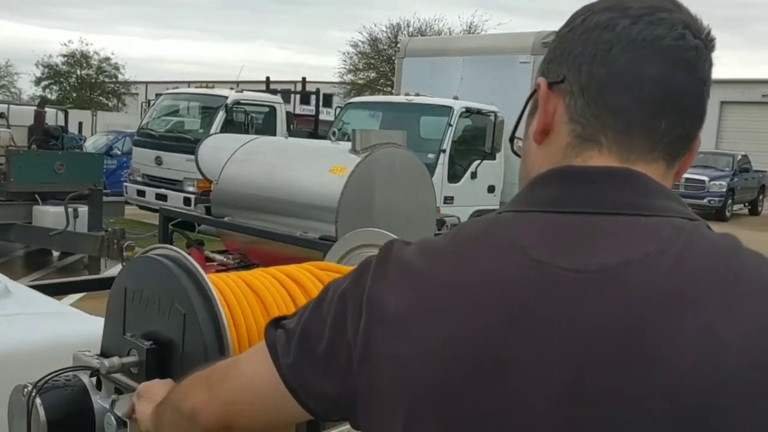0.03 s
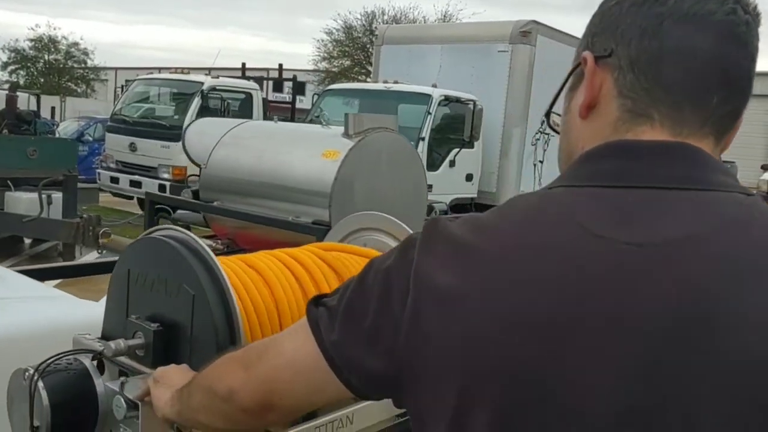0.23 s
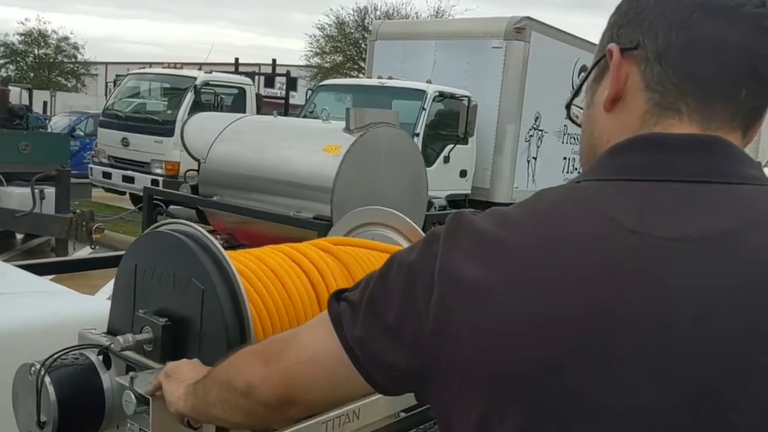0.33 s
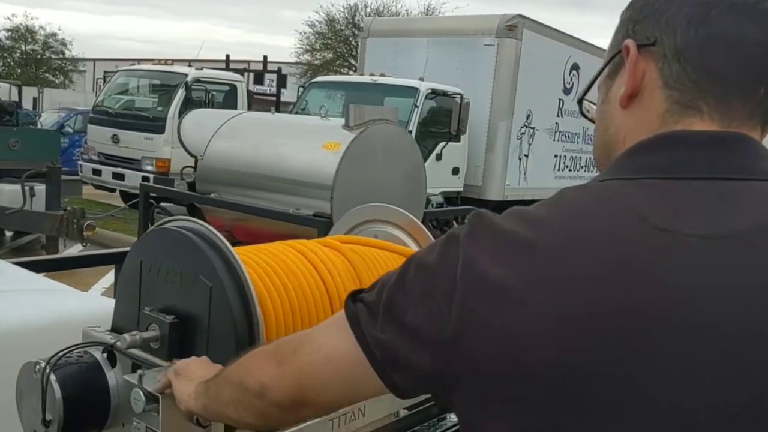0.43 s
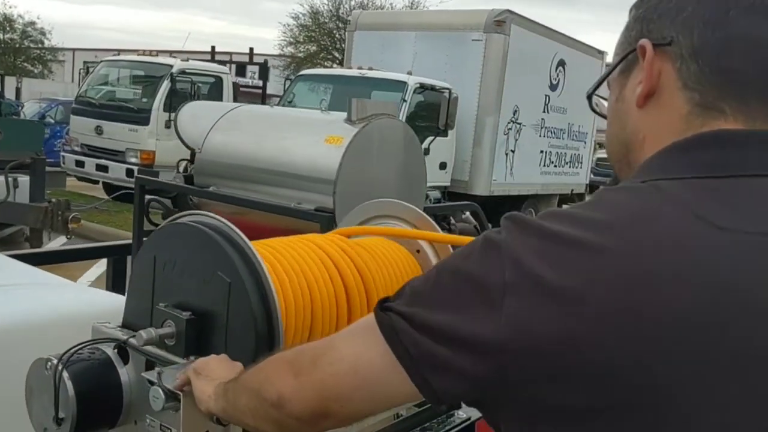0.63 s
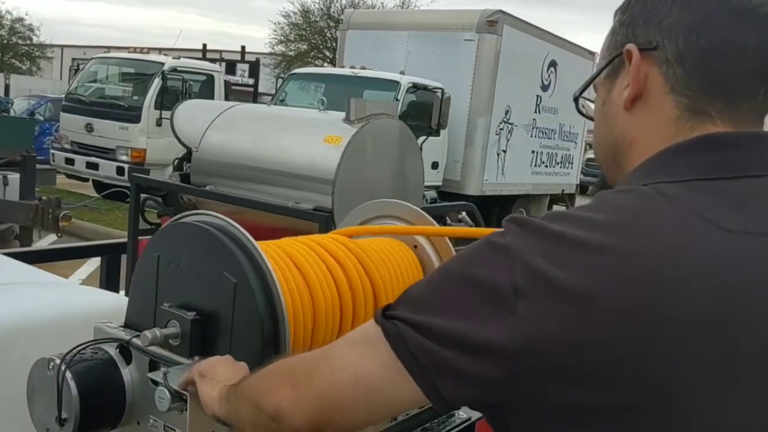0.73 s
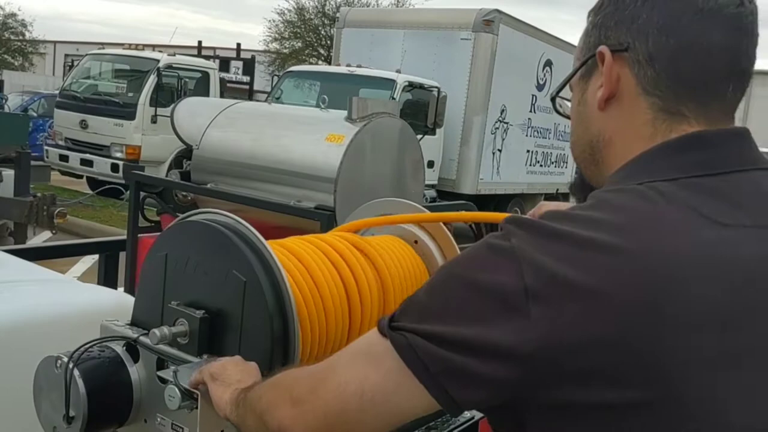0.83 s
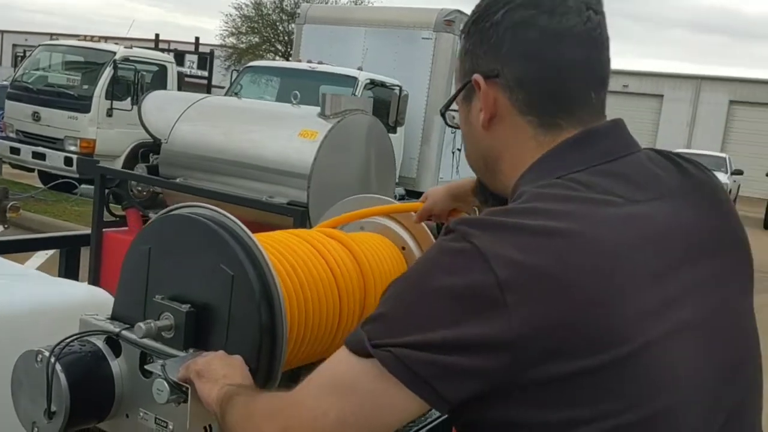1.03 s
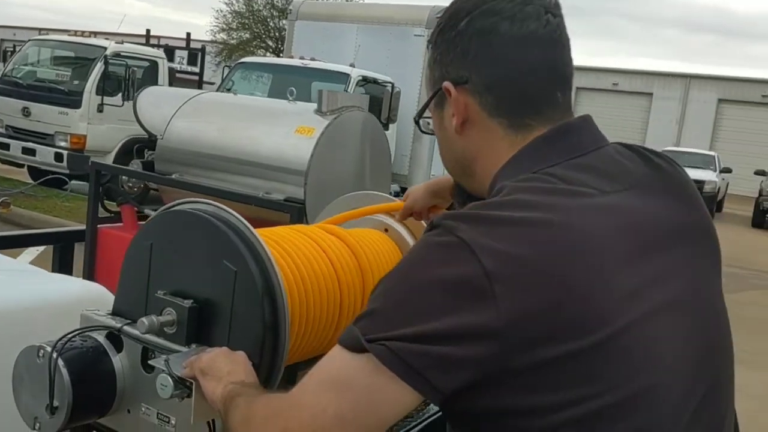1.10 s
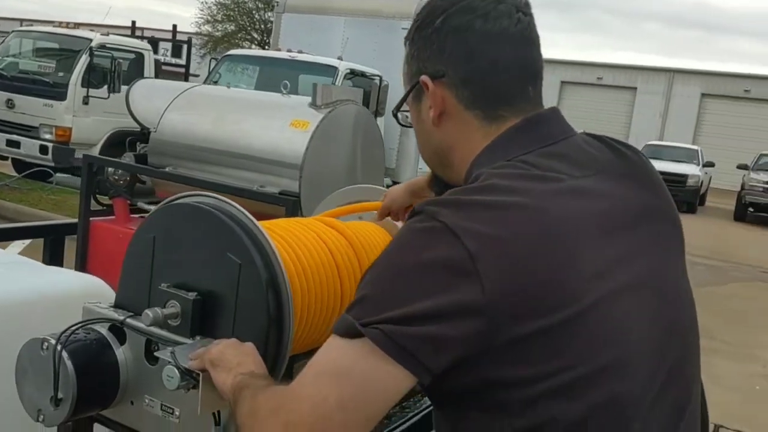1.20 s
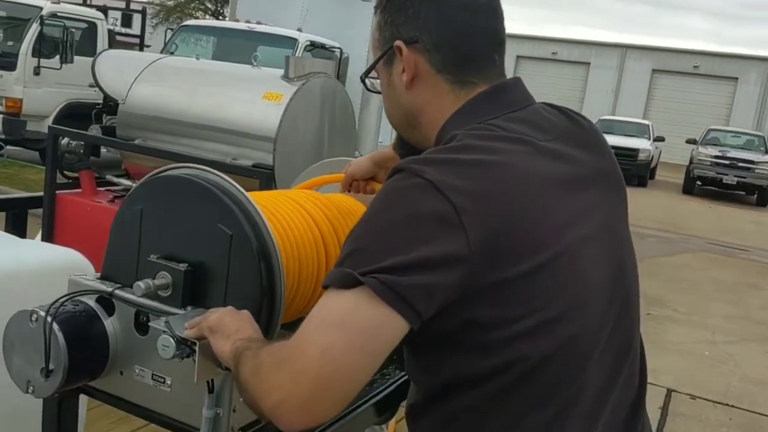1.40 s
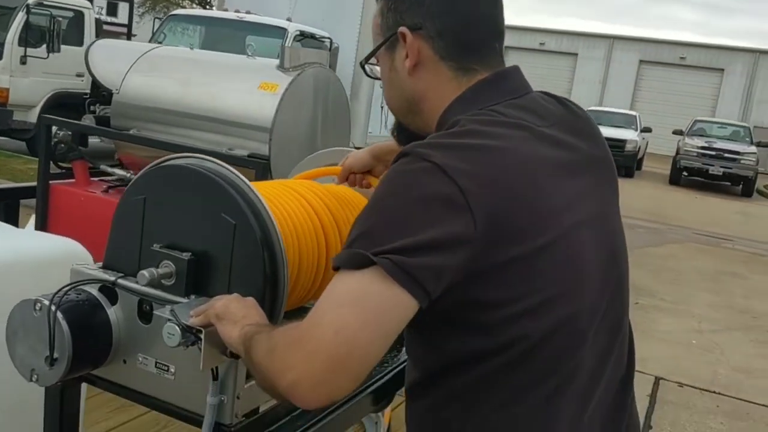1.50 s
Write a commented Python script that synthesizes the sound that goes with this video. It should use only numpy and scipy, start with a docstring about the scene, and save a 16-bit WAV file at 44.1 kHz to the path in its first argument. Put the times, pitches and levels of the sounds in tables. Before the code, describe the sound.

Close stereo camera microphone in a quiet yard catches a motorized hose reel starting with a click, whirring and rattling metallically for under a second, then switching off, dropping in pitch and ticking to a stop.

```python
"""An outdoor yard, a two-port camera microphone close to an electric hose reel. A hand switch clicks, the motor
spins up and drives the drum by a chain: hum and whine are tones locked to the tooth rate; rattle and frame
are coloured noise, most of it pulsed at each tooth. Knocks, ticks and slaps are short decaying hits.
The switch clicks off and the reel slows on a slackening chain, over the yard's faint traffic murmur."""
import sys
import numpy as np
from scipy.fft import rfft, irfft, next_fast_len
from scipy.io import wavfile
from scipy.ndimage import map_coordinates

SR = 44100
rng = np.random.default_rng(int(sys.argv[2]) if len(sys.argv) > 2 else 0)


def log_audio(samples):
    """Write samples as a 16-bit WAV file to the path given in sys.argv[1]."""
    # one column per channel
    frames = np.atleast_2d(samples).T
    # limit to full scale, then quantise
    limited = np.clip(frames, -1, 1)
    pcm = np.round(limited * 32767).astype(np.int16)
    wavfile.write(sys.argv[1], SR, pcm)


N = 68355

# Spectra are rescaled to rms 1 in ports(), so their dB are relative within each table.
# Motor and chain drive; the tooth rate is at full speed, spin-up and coast are time constants
ON_S, OFF_S = .2, .925
TOP_TOOTH_HZ, SPIN_UP_S, COAST_S = 209.5, .11, .45
# Hum at the tooth rate: (time [s], level [dB])
HUM_LEVEL = [(.22, -85), (.29, -54), (.33, -43.5), (.372, -36), (.406, -32), (.434, -53), (.45, -35.5),
             (.538, -26.5), (.57, -28.5), (.602, -39.5), (.69, -21.5), (.83, -26), (.9, -24.5),
             (.93, -27.5), (.947, -56), (1.025, -52), (1.05, -28.5), (1.09, -43), (1.16, -50), (1.2, -43),
             (1.26, -45), (1.32, -100)]
OCTAVE_DB, FLUTTER_DB, FLUTTER_PER_S = -23, 3, 40  # hum overtone; flutter of overtone and whine
# Drive-line whine: (multiple of tooth rate, level [dB re whine])
WHINE_ORDERS = [(.8, -17.5), (1.2, -20.5), (2.6, -21.5), (2.82, -19.5), (3.72, -18.5), (3.9, -13),
                (4.33, -16.5), (4.54, -17), (5, -20.5), (5.54, -24), (6.54, -22.5)]
WHINE_DB, WHINE_SPEED_POWER = -28.5, 10.3
# Frame ringing on when the pull stops: (time [s], frequency [Hz], level [dB], t60 [s])
AFTER_RING = (.95, 205, -26, .4)

# How each tooth sounds: burst shape, size spread, gated part for strikes and for sliding, place in the cycle
TOOTH_SHARP, TOOTH_SCATTER_DB, STRIKE_SHARE, SLIDE_SHARE, STRIKE_TURN = 1.4, 2.5, .5, .097, .84
# The chain going slack: time, smaller gated part for strikes (sliding turns steady), wider size spread,
# timing scatter in teeth
LOOSE_S, LOOSE_SHARE, LOOSE_SCATTER_DB, SLIP_TURNS = 1.15, .4, 3.5, .34
# Chain rattle, halved in the sum: (time [s], level [dB])
CHAIN_LEVEL = [(.235, -40.5), (.265, -43.5), (.29, -33.5), (.35, -31.5), (.44, -27), (.6, -25), (.7, -26.5),
               (.85, -25.5), (.93, -25.5), (.95, -33.5), (.965, -27.5), (1.03, -31.5), (1.09, -30),
               (1.18, -36.5), (1.22, -37.5), (1.31, -41), (1.335, -43), (1.43, -51), (1.47, -42),
               (1.55, -49)]
# Links sliding: (frequency [Hz], density [dB per Hz])
SLIDE_SPECTRUM = [(1590, -54), (2400, -24), (2700, -22.5), (2920, -11.5), (4010, -1.5), (5170, 0.5),
                  (5720, 1), (6820, -3), (8000, -3), (10400, -12), (17600, -120)]
# Rollers striking: (frequency [Hz], density [dB per Hz])
STRIKE_SPECTRUM = [(4000, -30), (7000, -10.5), (8300, -2.5), (10600, -2), (12900, 1), (14000, -7),
                   (15300, -10), (15700, -27), (16200, -65)]
STRIKE_OVER_SLIDE_DB, SPIKE_DB, SPIKES_PER_S = 4, -11, 700  # spikes: sharp roller hits within the bursts
DULL_EDGE_HZ, DULL_SPEED_POWER = 16500 / 1.44, 1.1  # treble above the edge fades with speed
# Taut links singing: (time [s], level [dB])
LINK_LEVEL = [(.4, -66), (.52, -35.5), (.9, -42), (1.1, -41.5), (1.25, -47.5), (1.4, -55), (1.45, -75)]
LINK_HZ, LINK_WIDTH_HZ = 5870, 380  # resonance, applied twice

# Steel frame under load: (time [s], scrape level [dB], ring level [dB])
FRAME_LEVELS = [(0.235, -49, -58), (0.281, -49, -44.5), (0.343, -45.5, -52), (0.381, -44, -44.5),
                (0.425, -45, -44.5), (0.461, -41.5, -42), (0.589, -41, -41.5), (0.597, -42, -34),
                (0.663, -39.5, -38.5), (0.813, -37, -31), (0.977, -41, -33.5), (1.105, -45.5, -37),
                (1.329, -51.5, -44.5), (1.55, -55, -52.5)]
# Frame scrape: (frequency [Hz], density [dB per Hz])
SCRAPE_SPECTRUM = [(250, -34), (330, -18), (600, -8.5), (1000, 2.5), (1300, 7.5), (1750, 1.5), (2200, -4),
                   (2600, -17), (2800, -35), (3500, -120)]
# Frame resonances: (frequency [Hz], width [Hz], level [dB])
FRAME_MODES = [(421.6, 33, -4.5), (541.6, 18, 1), (593, 38, -4.5), (770, 37, 1.5), (816, 34, 1.5),
               (872, 48, -2.5), (946, 28.4, -2), (1144, 25, -6), (1243, 47, -8)]
# Low frame: (time [s], level of the lowest mode [dB], level of the next modes [dB])
LOW_LEVELS = [(.235, -51.5, -51.5), (.35, -50.5, -43), (.6, -46, -44.5), (.72, -49.5, -46),
              (.9, -41.5, -53), (1.0, -49, -38), (1.15, -52, -40.5), (1.22, -45, -43.5), (1.35, -46.5, -45),
              (1.55, -47, -46)]
RUMBLE_HZ, RUMBLE_WIDTH_HZ = 108.2, 27.7  # lowest mode, applied twice
# Next frame modes, their sum applied twice: (frequency [Hz], width [Hz], level [dB])
BOOM_MODES = [(170, 46, 0.5), (207.8, 26.4, 1.5), (265.8, 56, -1), (324.5, 76, -7.5)]

# Hand switch, on and off: (time [s], snap level [dB], rise [s], t60 [s], ring level [dB re snap])
SWITCH_CLICKS = [(0.2053, -17.5, 0.0011, 0.06, -14), (0.926, -13.5, 0.0041, 0.06, 4)]
# Switch snap: (frequency [Hz], density [dB per Hz])
SNAP_SPECTRUM = [(400, -40), (900, -14), (1840, -5), (2110, -4), (2700, -11.5), (3350, -7.5), (5310, 5),
                 (6380, -9), (7560, 4), (13100, -2.5), (15700, -12), (16500, -36)]
# Contact spring, lowered as a whole by 5.5 dB later: (frequency [Hz], level [dB re ring], t60 [s])
CONTACT_MODES = [(6500, -5, .03), (9260, 0, .075), (10300, -7, .045), (12350, -4, .065), (13200, -5, .035)]

# Drum knocks: (time [s], level [dB], frequency [Hz], rise [s], t60 [s])
DRUM_KNOCKS = [(.2715, -33.5, 1730, 0.003, 0.096), (.292, -38.5, 1700, .002, 0.069),
               (0.317, -36, 1380, .002, .04), (.33, -41, 1405, .002, .05), (0.4383, -30, 1747, .003, 0.063),
               (.4903, -20, 1780, 0.00045, 0.023), (0.7227, -16.5, 1570, 0.0012, 0.016),
               (.925, -25.5, 1757, 0.0014, 0.039)]
# Drum wall modes: (ratio to knock frequency, level [dB re knock])
DRUM_MODES = [(.78, -3), (1, 2.5), (1.15, -4.5), (1.4, -14)]
KNOCK_SPREAD_DB, KNOCK_WANDER_TURNS = 2, .3  # each blow excites the modes differently; phase drift

# Hand and chain taking up, halved in the sum: (time [s], level [dB])
TICK_HITS = [(.097, -40), (.241, -36), (.254, -30), (0.264, -22)]
TICK_T60_S, TICK_RISE_S = .029, .00091
# Hand moving on the switch: (time [s], level [dB], rise [s], t60 [s])
HAND_RUSTLE = (.1, -61.5, 0.1, 4)
# Loose links slapping: (time [s], level [dB], t60 [s])
LINK_SLAPS = [(.12, -48, 0.072), (1.0408, -22, .015), (1.109, -29, .02), (1.14, -24.5, 0.04),
              (1.19, -32, .015), (1.199, -31, .015), (1.2074, -34, 0.014), (1.2185, -33, .012),
              (1.2359, -30, .012), (1.2482, -28, .015), (1.2605, -31, .01), (1.266, -19.5, 0.016),
              (1.273, -29, .015), (1.288, -35, 0.022), (1.3005, -33, .025), (1.3114, -33, 0.023),
              (1.379, -46, .05), (1.388, -42, .04), (1.398, -40.5, .025), (1.4434, -48, 0.037),
              (1.4573, -45, 0.034), (1.473, -46, .03), (1.4893, -41, .03), (1.4958, -39, 0.027)]
SLAP_RISE_S = .00047
# Slap colour: (frequency [Hz], density [dB per Hz])
SLAP_SPECTRUM = [(3000, -24), (4500, 4.5), (6500, -4.5), (8500, -5), (11300, 1), (12600, -4.5),
                 (13800, -16), (15500, -17), (16000, -70)]

# Distant yard: (frequency [Hz], density [dB per Hz])
YARD_SPECTRUM = [(15, -70), (40, -50), (82, -8), (126, -10.5), (204, -11), (330, -3), (450, -16.5),
                 (800, -21.5), (2000, -26.5), (2700, -30), (3550, -24.5), (6000, -43), (9000, -42),
                 (15600, -61), (16200, -94)]
YARD_DB = -50.5

# Microphone ports, likeness: (frequency [Hz], left-right correlation)
PORT_LIKENESS = [(60, 1), (270, 0.87), (450, 0.69), (800, 0.75), (1300, 0.16), (2500, 0.59), (5000, 0.13),
                 (9000, 0.12), (15000, 0.14)]
# Microphone ports, balance: (frequency [Hz], left minus right [dB])
PORT_BALANCE = [(60, -6), (110, 1.5), (200, -0.5), (380, 0), (700, -1.5), (1290, 0.5), (2380, -2.5),
                (4400, 3), (8120, -4.5), (15000, -23)]
LEFT_LEAD_S, BAND_LIMIT_HZ = .00012, 16600  # left port hears first; camera band limit


def amp(db):
    """Convert dB to gain."""
    return 10 ** (np.asarray(db) / 20)


def unit(x):
    """Scale to rms 1."""
    return x / np.sqrt(np.mean(x ** 2) + 1e-20)


def along(points, hz):
    """Interpolate (Hz, value) points on a log frequency axis."""
    f, v = np.transpose(points)
    return np.interp(np.log(hz + 1), np.log(f + 1), v)


def spectrum(points):
    """Turn (Hz, dB) points into a gain over frequency."""
    return lambda hz: amp(along(points, hz))


def curves(rows):
    """Give one value per sample for each column after the time."""
    s, *cols = np.transpose(rows)
    return [np.interp(np.arange(N) / SR, s, c) for c in cols]


def filtered(x, response):
    """Multiply the spectrum of x by a response of frequency."""
    m = next_fast_len(N + SR // 2)  # padding keeps tails from wrapping
    return irfft(rfft(x, m) * response(np.fft.rfftfreq(m, 1 / SR)), m)[..., :N]


def peaks(rows, f):
    """Sum causal resonances of (Hz, width Hz, dB) with alternating sign."""
    total = 0
    for k, (centre, width, db) in enumerate(rows):
        band = 1j * f * width
        total = total + (-1) ** k * amp(db) * band / (centre * centre - f * f + band)
    return total


def port_lean(hz):
    """Gain of the left and right ports at a frequency."""
    return amp(along(PORT_BALANCE, hz) * np.array([[.5], [-.5]]))


def ports(pair, colour):
    """Colour two unrelated draws and mix them as the two ports hear them, with mid rms 1."""
    def mid_side(hz):
        angle = np.arccos(np.clip(along(PORT_LIKENESS, hz), -1, 1)) / 2
        return colour(hz) * [np.cos(angle), np.sin(angle)]

    def lean_and_lead(hz):
        return port_lean(hz) * np.exp(1j * np.pi * hz * LEFT_LEAD_S * np.array([[1], [-1]]))

    mid, side = filtered(pair, mid_side)
    out = filtered(np.array([mid + side, mid - side]), lean_and_lead)
    return out / np.sqrt(np.mean(out.mean(0) ** 2))


def noise():
    """Two channels of white noise."""
    return rng.standard_normal((2, N))


def wobble(rate):
    """A smooth random curve through rate knots a second."""
    knots = rng.standard_normal(int(N * rate / SR) + 4)
    return map_coordinates(knots, [np.arange(N) * rate / SR])


def burst(start_s, rise_s, t60):
    """Envelope of a hit, and the time since it began."""
    t = np.maximum(np.arange(N) / SR - start_s, 0)
    return (1 - np.exp(-t / rise_s)) * amp(-60 * t / t60), t


def reel():
    """The running reel: tones, chain and frame, sharing one count of passing teeth."""
    running = burst(ON_S + .015, .01, 1e6)[0]  # fades in, then holds
    turns = np.cumsum(TOP_TOOTH_HZ * speed()) / SR  # one turn is one tooth
    size = rng.standard_normal(400)
    slide_gate = teeth(turns, SLIDE_SHARE, size)
    return running * (motor_tones(turns) + chain(turns, size, slide_gate)
                      + singing_links(slide_gate) + frame(slide_gate))


def speed():
    """Share of full speed: rises exponentially under power, then decays as it coasts."""
    t = np.arange(N) / SR
    spin_up = 1 - np.exp(-np.maximum(t - ON_S, 0) / SPIN_UP_S)
    return spin_up * np.exp(-np.maximum(t - OFF_S, 0) / COAST_S)


def motor_tones(turns):
    """Hum and whine as sines locked to the teeth, and a fixed-pitch frame ring once the pull stops."""
    octave = amp(OCTAVE_DB + FLUTTER_DB * wobble(FLUTTER_PER_S)) * np.sin(4 * np.pi * turns)
    hum = amp(curves(HUM_LEVEL)[0]) * (np.sin(2 * np.pi * turns) + octave)
    whine = np.zeros(N)
    for order, db in WHINE_ORDERS:
        level = amp(db + FLUTTER_DB * wobble(FLUTTER_PER_S))
        whine += level * np.sin(2 * np.pi * (order * turns + rng.random()))
    start_s, hz, db, t60 = AFTER_RING
    env, t = burst(start_s, .012, t60)
    whine *= amp(WHINE_DB) * speed() ** WHINE_SPEED_POWER * (1 - env)  # ducks under the ring
    after_ring = amp(db) * env * np.sin(2 * np.pi * hz * t)
    return np.sqrt(2) * (hum + whine + after_ring)


def teeth(turns, share, size):
    """Loudness of the chain within each tooth: a steady part and a burst of random size, late or early if slack."""
    slack = 1 / (1 + np.exp(-(np.arange(N) / SR - LOOSE_S) / .051))
    slip = np.interp(turns, np.arange(len(size)), size[::-1])
    turns = turns + SLIP_TURNS * slack * slip
    from_strike = turns - STRIKE_TURN
    hump = unit((.5 + .5 * np.cos(2 * np.pi * from_strike)) ** TOOTH_SHARP)
    share = np.clip(share + (LOOSE_SHARE - STRIKE_SHARE) * slack, 0, 1)
    scatter_db = TOOTH_SCATTER_DB + (LOOSE_SCATTER_DB - TOOTH_SCATTER_DB) * slack
    tooth_size = size[(from_strike + 1.5).astype(int)]
    return unit(1 - share + share * hump * amp(tooth_size * scatter_db))


def chain(turns, size, slide_gate):
    """Rollers striking and links sliding: noise pulsed by the teeth, strikes losing treble as they slow."""
    spikes = unit((rng.random(N) < SPIKES_PER_S / SR) * rng.standard_normal(N))
    hits = teeth(turns, STRIKE_SHARE, size) * (noise() + amp(SPIKE_DB) * spikes)
    strikes = ports(hits, spectrum(STRIKE_SPECTRUM))
    dull = filtered(strikes, lambda f: 1 / (1 + (f / DULL_EDGE_HZ) ** 8))
    strikes = dull + (strikes - dull) * speed() ** DULL_SPEED_POWER
    slide = ports(slide_gate * noise(), spectrum(SLIDE_SPECTRUM))
    return amp(curves(CHAIN_LEVEL)[0]) * (slide + amp(STRIKE_OVER_SLIDE_DB) * strikes) / 2


def singing_links(slide_gate):
    """Taut links singing: noise with the sliding gate through one narrow resonance."""
    sing = ports(slide_gate * noise(), lambda f: peaks([(LINK_HZ, LINK_WIDTH_HZ, 0)], f) ** 2)
    return amp(curves(LINK_LEVEL)[0]) * sing


def frame(slide_gate):
    """Steel frame: scrape and ring of noise with the sliding gate, and low modes driven by steady noise."""
    scrape_db, ring_db = curves(FRAME_LEVELS)
    rumble_db, boom_db = curves(LOW_LEVELS)
    scrape = ports(slide_gate * noise(), spectrum(SCRAPE_SPECTRUM))
    ring = ports(slide_gate * noise(), lambda f: peaks(FRAME_MODES, f) * (f < 2500))
    rumble = ports(noise(), lambda f: peaks([(RUMBLE_HZ, RUMBLE_WIDTH_HZ, 0)], f) ** 2)
    boom = ports(noise(), lambda f: peaks(BOOM_MODES, f) ** 2)
    return amp(scrape_db) * scrape + amp(ring_db) * ring + amp(rumble_db) * rumble + amp(boom_db) * boom


def switch():
    """On and off: a bright noise snap, and the contact spring rings as decaying sines."""
    snap = ports(noise(), spectrum(SNAP_SPECTRUM))
    out = np.zeros((2, N))
    for s, db, rise_s, t60, ring_db in SWITCH_CLICKS:
        out += amp(db) * burst(s, rise_s, t60)[0] * snap
        for hz, mode_db, ring_t60 in CONTACT_MODES:
            env, t = burst(s + rise_s, rise_s, ring_t60)
            tone = np.sin(2 * np.pi * (hz * t + rng.random((2, 1))))
            out += amp(db + ring_db + mode_db - 5.5) * port_lean(hz) * env * tone
    return out


def drum():
    """Short dull knocks of the drum wall: decaying modes whose phase wavers."""
    out = np.zeros((2, N))
    for s, db, hz, rise_s, t60 in DRUM_KNOCKS:
        env, t = burst(s, rise_s, t60)
        for ratio, mode_db in DRUM_MODES:
            port_phase = rng.random((2, 1)) * .36
            turns = ratio * hz * t + KNOCK_WANDER_TURNS * wobble(100) + port_phase
            level = amp(db + mode_db + rng.normal(0, KNOCK_SPREAD_DB))
            out += level * env * np.sin(2 * np.pi * turns)
    return out


def link_slaps():
    """Loose links slapping: short decaying bursts of bright noise."""
    env = sum(amp(db) * burst(s, SLAP_RISE_S, t60)[0] for s, db, t60 in LINK_SLAPS)
    return env * ports(noise(), spectrum(SLAP_SPECTRUM))


def hand_ticks():
    """Small bright noise ticks of hand and chain, over the hand's faint rustle."""
    env = sum(amp(db) * burst(s, TICK_RISE_S, TICK_T60_S)[0] for s, db in TICK_HITS) / 2
    start_s, db, rise_s, t60 = HAND_RUSTLE
    env = env + amp(db) * burst(start_s, rise_s, t60)[0]
    slide, strike = spectrum(SLIDE_SPECTRUM), spectrum(STRIKE_SPECTRUM)
    return env * ports(noise(), lambda f: slide(f) + strike(f))


def yard():
    """The yard's distant murmur of traffic: steady coloured noise."""
    return amp(YARD_DB) * ports(noise(), spectrum(YARD_SPECTRUM))


def scene():
    """The reel and its hits close to the microphone, over the distant yard."""
    return reel() + switch() + drum() + link_slaps() + hand_ticks() + yard()


def record(dry):
    """The camera keeps nothing above its band limit."""
    return filtered(dry, lambda hz: hz < BAND_LIMIT_HZ)


dry = scene()
out = record(dry)
log_audio(out)
```